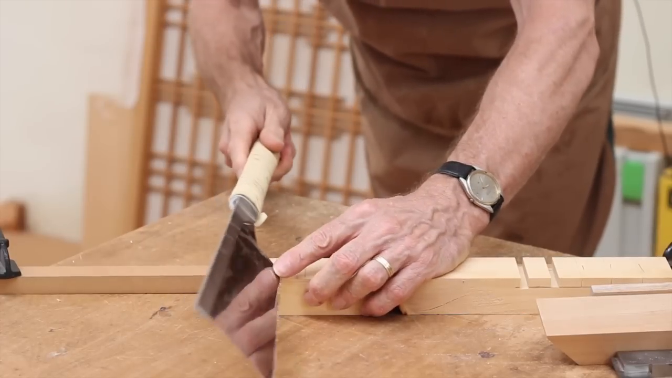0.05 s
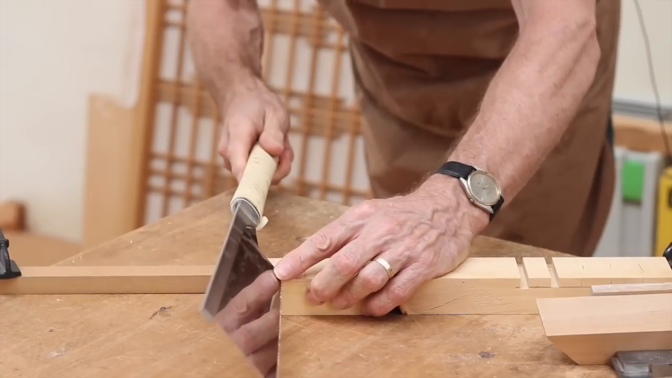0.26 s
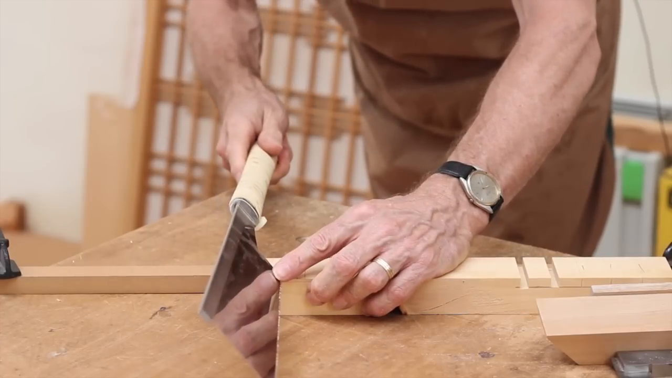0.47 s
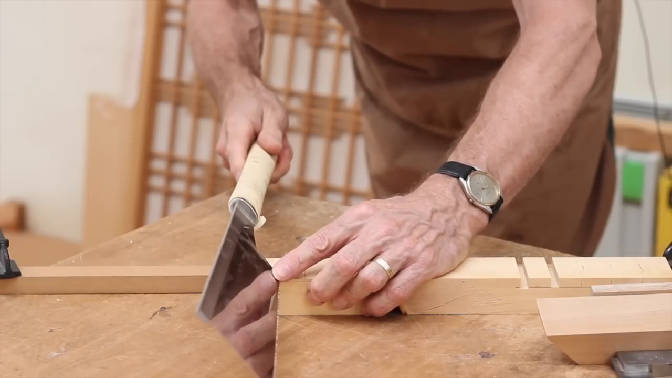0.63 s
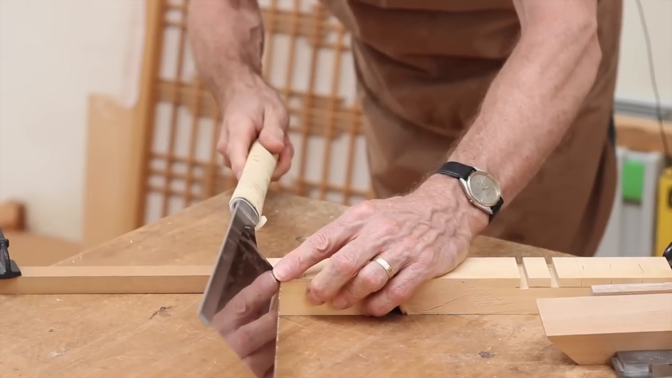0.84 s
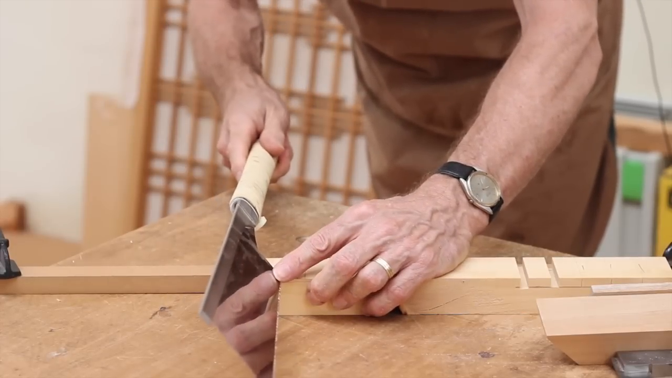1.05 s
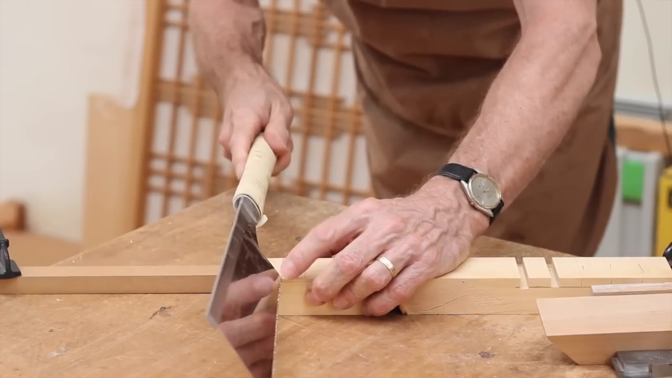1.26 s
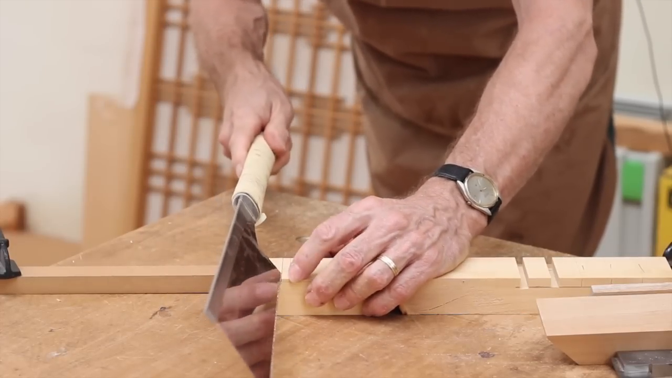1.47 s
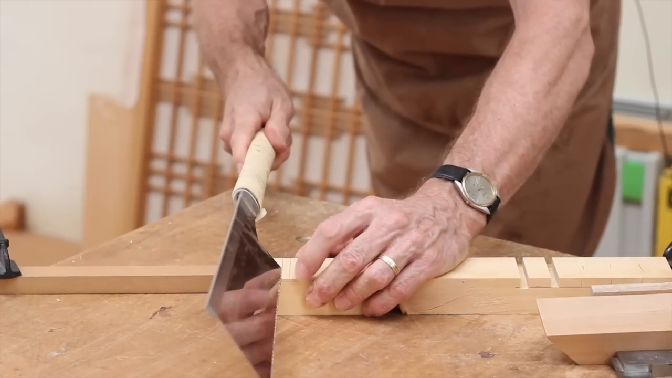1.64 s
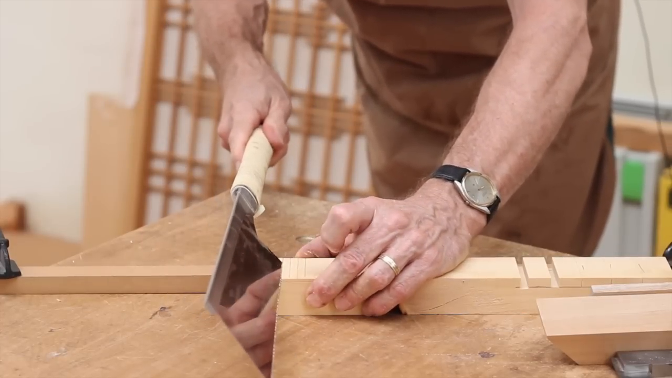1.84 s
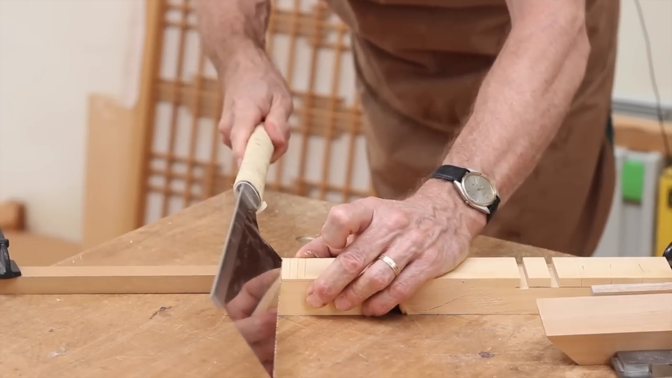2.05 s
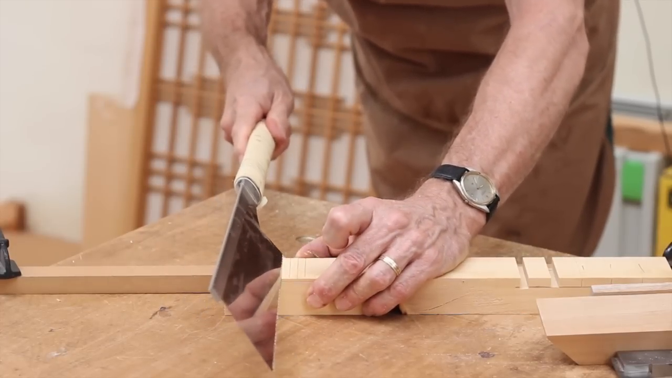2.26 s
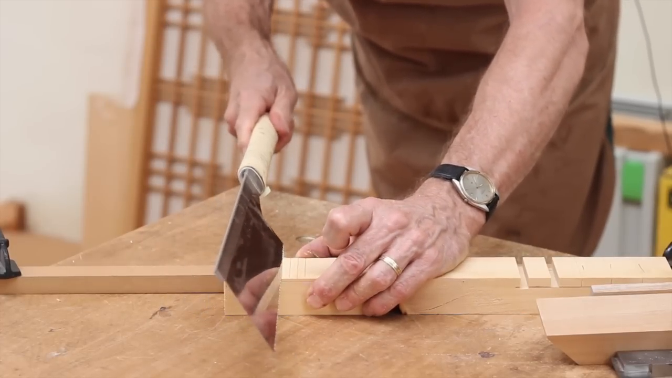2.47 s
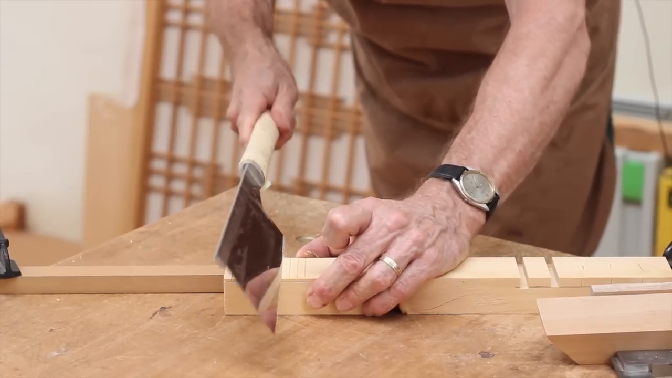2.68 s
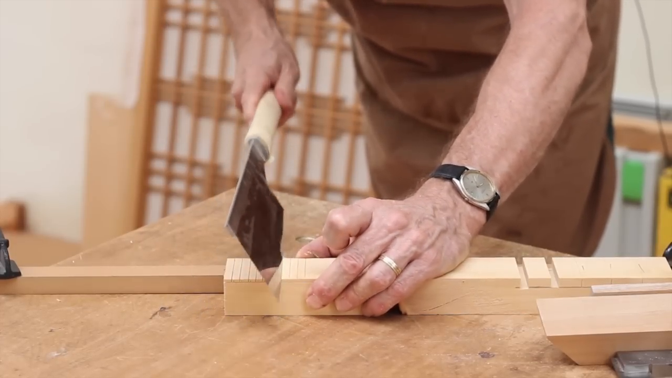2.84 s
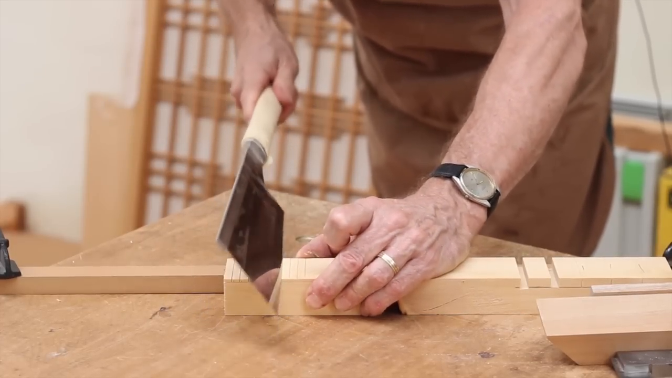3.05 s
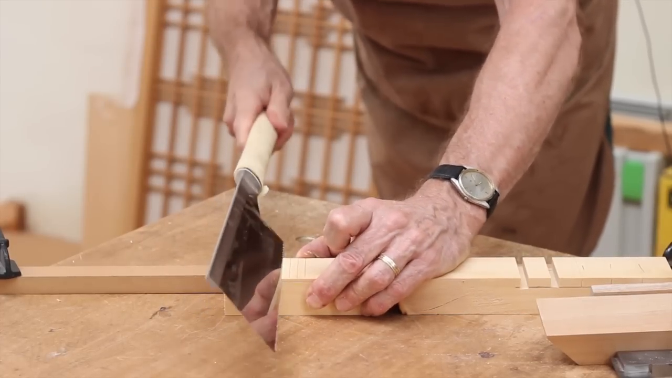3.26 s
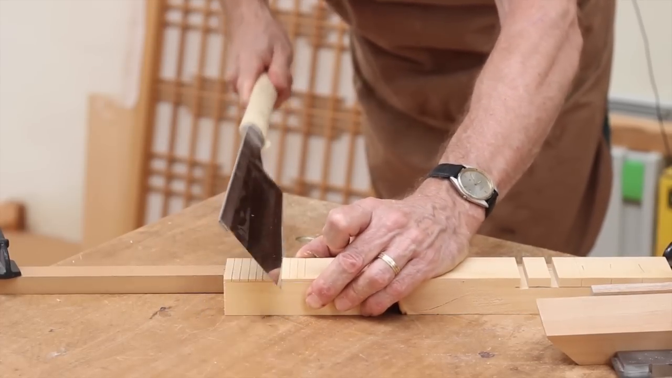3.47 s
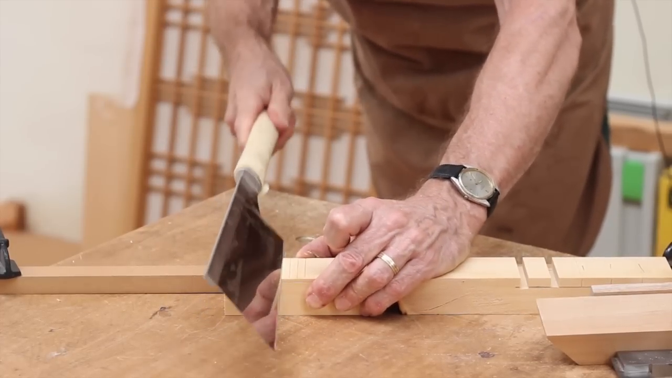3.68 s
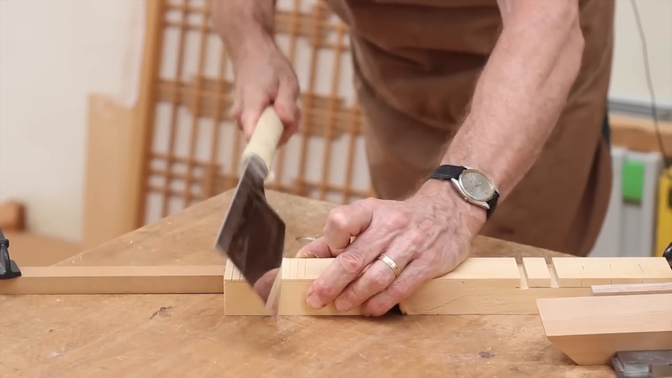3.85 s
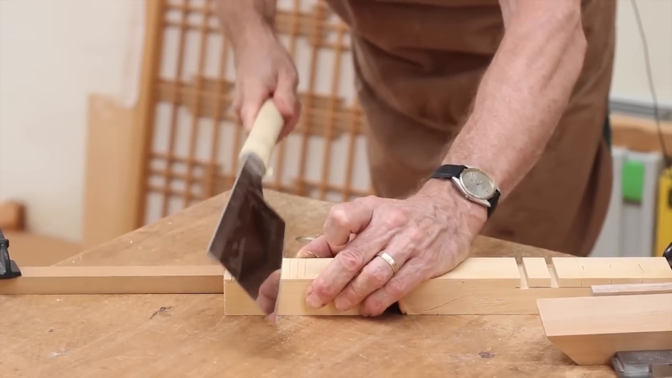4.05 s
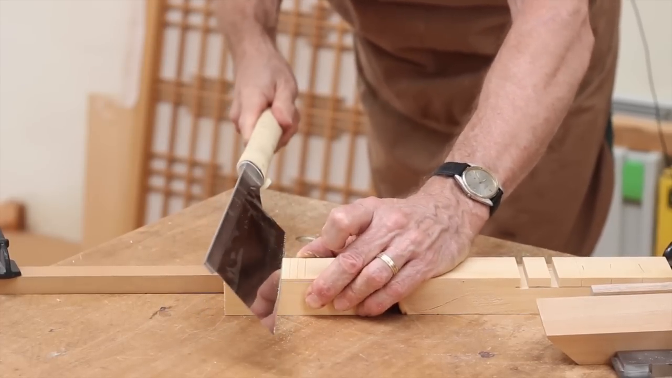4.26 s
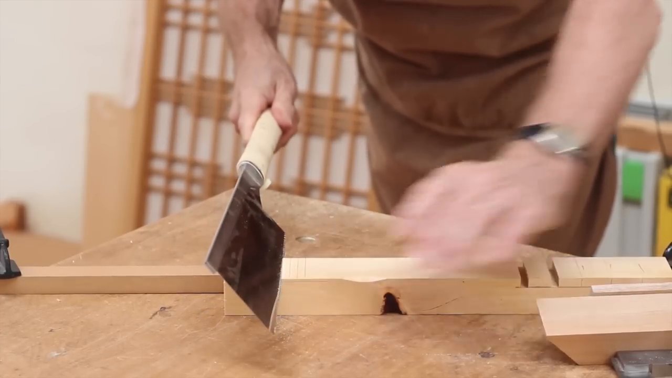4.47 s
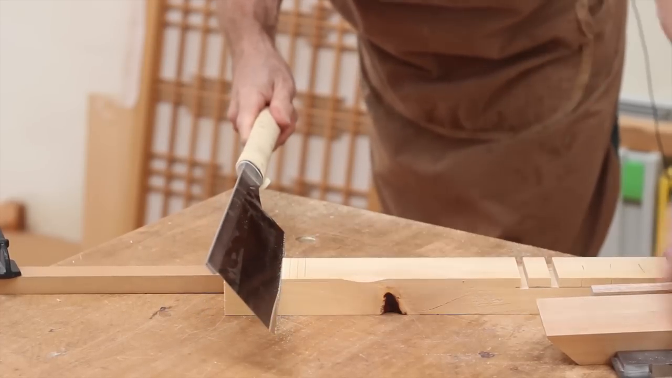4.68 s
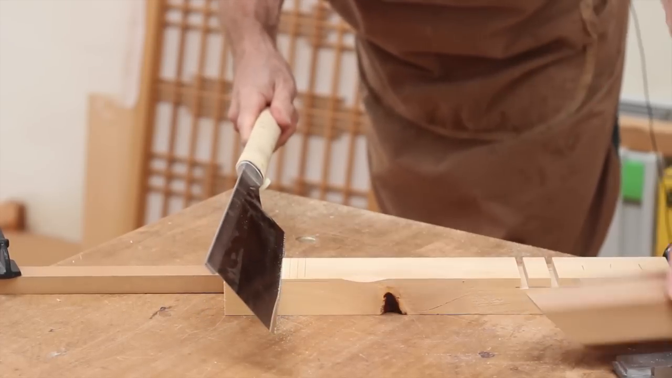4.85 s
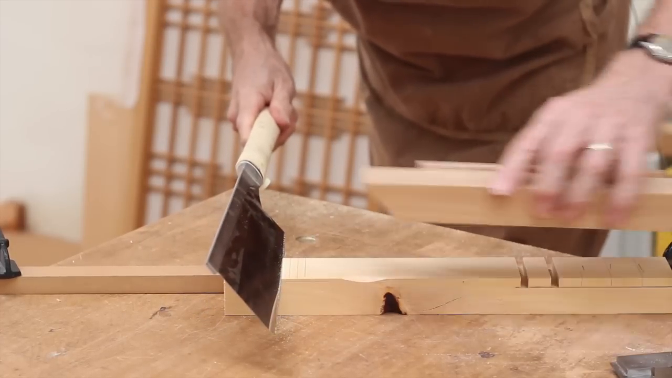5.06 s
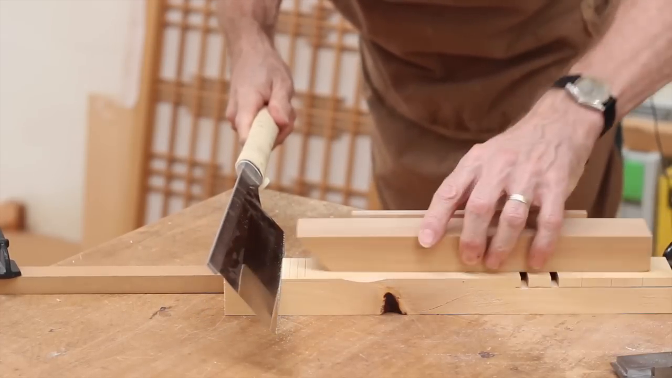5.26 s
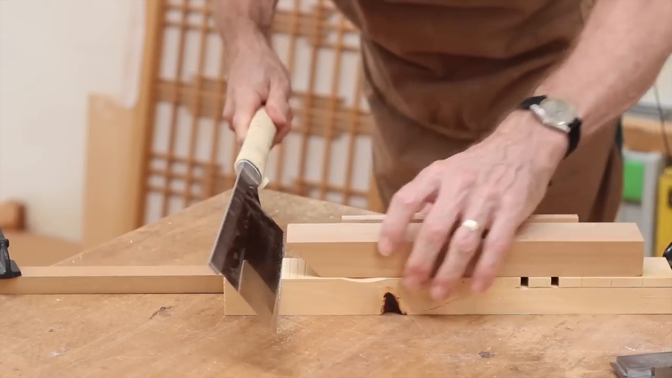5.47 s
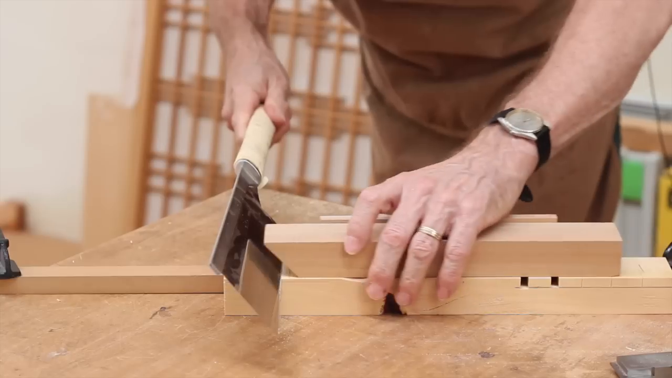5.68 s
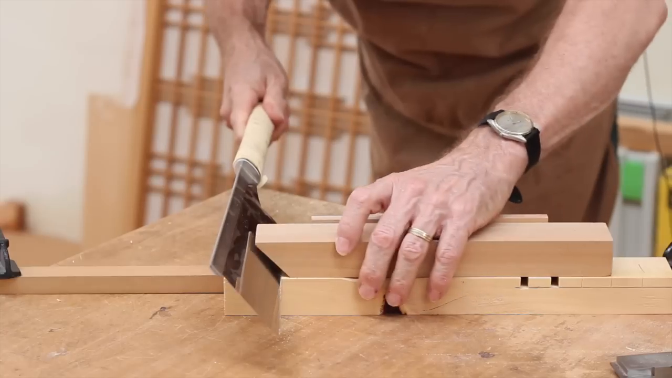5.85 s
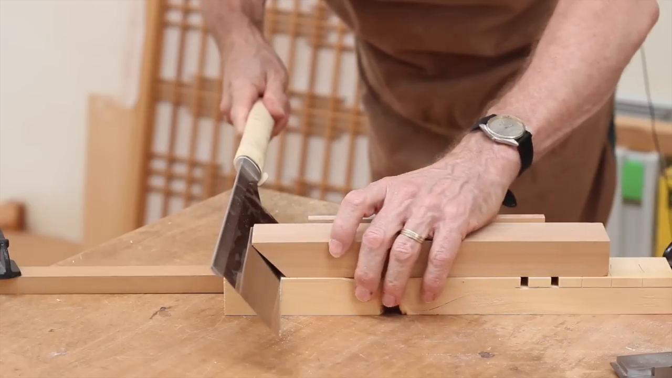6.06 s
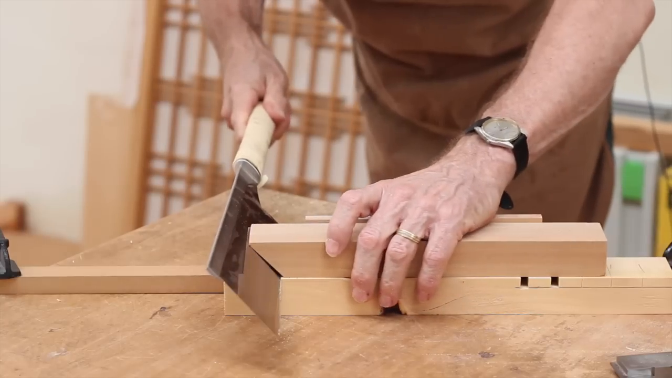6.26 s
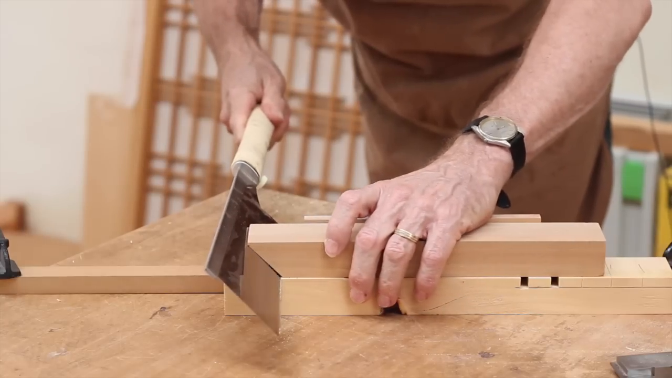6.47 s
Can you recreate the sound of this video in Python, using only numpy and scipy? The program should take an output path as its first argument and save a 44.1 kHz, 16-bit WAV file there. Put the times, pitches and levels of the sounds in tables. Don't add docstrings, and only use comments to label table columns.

```python
import sys
import numpy as np
from scipy import signal
from scipy.fft import rfft, irfft
from scipy.io import wavfile
from scipy.ndimage import uniform_filter1d

SR = 44100
rng = np.random.default_rng(int(sys.argv[2]) if len(sys.argv) > 2 else 0)


def natural_amplitude(level_db):
    exponent = np.asarray(level_db, float) / 20
    return 10 ** exponent


def generate_wav(sig):
    pcm = np.round(np.clip(np.atleast_2d(sig).T, -1, 1) * 32767).astype(np.int16)
    wavfile.write(sys.argv[1], SR, pcm)


N = 287532


def rms_one(x):
    return x / np.sqrt(np.mean(x ** 2) + 1e-20)


def in_time(rows):
    s, *columns = np.transpose(rows)
    return [np.interp(np.arange(N) / SR, s, c) for c in columns]


def band_pass(x, order, low_hz, high_hz):
    return signal.sosfilt(signal.butter(order, [low_hz, high_hz], "band", fs=SR, output="sos"), x)


def coloured(points):
    log_hz = np.log(np.arange(N // 2 + 1) * SR / N + 1)
    point_hz, point_db = np.transpose(points)
    shape = natural_amplitude(np.interp(log_hz, np.log(point_hz), point_db))
    return rms_one(irfft(rfft(rng.standard_normal(N)) * shape, N))


def resonate(x, peaks):
    out = 0
    for k, (hz, width, level_db) in enumerate(peaks):
        r = np.exp(-np.pi * width / SR)
        b = (1 - r * r) / 2 * np.array([1, 0, -1])
        a = [1, -2 * r * np.cos(2 * np.pi * hz / SR), r * r]
        out = out + (-1) ** k * natural_amplitude(level_db) * signal.lfilter(b, a, x)
    return out


def ring(clicks, hz, t60):
    r = natural_amplitude(-60 / (t60 * SR))
    w = 2 * np.pi * hz / SR
    return signal.lfilter([0, np.sin(w)], [1, -2 * r * np.cos(w), r * r], clicks + 1e-18)


def strike(times, sizes, modes, spread_db):
    at = np.round(np.array(times) * SR).astype(int)
    out = np.zeros(N)
    chance = rng.standard_normal((len(at), len(modes)))
    for k, (hz, level_db, t60) in enumerate(modes):
        clicks = np.zeros(N)
        clicks[at] = (-1) ** k * sizes * natural_amplitude(level_db + spread_db * chance[:, k])
        out += ring(clicks, hz, t60)
    return out


def grains(per_s, spread_db):
    sizes = natural_amplitude(spread_db * np.minimum(rng.exponential(1, N), 3)) * rng.choice([-1, 1], N)
    return rms_one(sizes * (rng.random(N) < per_s / SR))


def bursts(times, sizes, decay_s):
    hits = np.zeros(N)
    hits[np.round(np.array(times) * SR).astype(int)] = sizes
    return signal.lfilter([1], [1, -np.exp(-1 / (decay_s * SR))], hits) * rng.standard_normal(N)


def swells(start, top, end, level_db, fall_db, curve):
    t = np.arange(0, N + 32, 32) / SR
    power = 1e-14
    for a, b, c, db in zip(start, top, end, level_db):
        before, after = (b - t) / max(b - a, .005), (t - b) / max(c - b, .005)
        away = np.where(t < b, before, after)
        power = power + natural_amplitude(2 * np.maximum(db - fall_db * away ** curve, -200))
    return np.interp(np.arange(N) / SR, t, 10 * np.log10(power))


# (frequency [Hz], level per Hz [dB])
HISS = [(25, 5), (150, 1), (600, -1), (2000, 0.5), (8000, 1), (15000, -0.5)]
HISS_DB = [
    [-52],
    [-53],
]


def preamp_hiss():
    return natural_amplitude(np.array(HISS_DB)) * np.array([coloured(HISS), coloured(HISS)])


# (frequency [Hz], level per Hz [dB])
AIR = [(25, -10.5), (72, 0), (200, -4), (430, -10), (600, -11), (870, -5.5), (1300, -10), (2200, -21.5),
       (4000, -32.5), (9000, -43)]


def room_air(duck_db):
    fade_db = 0.37 * np.arange(N) / SR
    return natural_amplitude(-40 - fade_db + .08 * duck_db) * coloured(AIR)


# (frequency [Hz], time to fall 60 dB [s], level [dB])
SHOP = [(169, 1, 2.5), (398, 0.9, -4), (920, 0.39, 10), (2060, 0.98, -5), (3730, 1, 8.5), (6900, 0.39, 20)]


def shop(x):
    t, tail = np.arange(SR) / SR, 0
    for hz, t60, level_db in SHOP:
        band = band_pass(rng.standard_normal(SR), 2, hz / 1.6, hz * 1.6)
        tail = tail + band / np.sqrt(hz) * natural_amplitude(level_db - 60 * t / t60)
    tail = tail * np.clip((t - .004) / 0.016, 0, 1)
    return signal.fftconvolve(x, tail / np.sqrt(SR / 1000))[:N]


# (time of deepest dip [s], depth [dB])
BITES = [
    (2.48, 19),
    (2.58, 14),
    (2.92, 18),
    (3.575, 13.5),
    (5.4, 10.5),
]


def limiter_db():
    t = np.arange(N) / SR
    attack_db_per_s, hold_s, release_db_per_s = 145, 0.052, 40
    dips = []
    for s, depth_db in BITES:
        attack = attack_db_per_s * np.maximum(s - t, 0)
        release = release_db_per_s * np.maximum(t - s - hold_s, 0)
        dips.append(depth_db - attack - release)
    return -np.maximum(np.max(dips, axis=0), 0)


# (start [s], peak [s], end [s], level [dB])
SLEEVE = [
    (4.27, 4.32, 4.45, -64),
    (4.555, 4.62, 4.786, -40.5),
]
# (frequency [Hz], width [Hz], level [dB])
CLOTH = [(3060, 670, 2.5), (4600, 2400, -3), (6760, 2400, -6.5), (11800, 220, -7)]


def sleeve():
    swish_db = swells(*np.transpose(SLEEVE), fall_db=17, curve=2.3)
    return natural_amplitude(swish_db) * rms_one(resonate(grains(8300, 2), CLOTH))


# (time [s], peak level [dB])
CREAKS_OUT = [(1.3688, -29), (1.382, -21.5), (1.399, -20.5), (1.4172, -21), (1.4646, -19), (1.476, -23),
              (1.4858, -20), (1.495, -20), (1.503, -23), (1.5205, -18.5), (1.5445, -18.5), (1.577, -19.5),
              (1.5968, -18.5), (1.6144, -17), (1.6346, -20.5), (1.6687, -19.5), (1.695, -21), (1.755, -21.5),
              (1.774, -20.5), (1.7876, -21), (1.943, -19.5), (2.053, -16.5), (2.0596, -22), (2.0773, -19.5),
              (2.0954, -18), (2.139, -15), (2.1973, -15), (5.2604, -29.5), (5.279, -29), (5.31, -28.5)]
# (time [s], peak level [dB])
CREAKS_BACK = [(0.014, -24.5), (0.0221, -29), (0.029, -28), (0.0374, -25.5), (0.0492, -22), (0.0784, -26.5),
               (0.6578, -28), (0.6847, -21), (3.059, -27), (3.091, -23.5), (3.6662, -17), (4.0669, -21.5),
               (4.0848, -23), (4.382, -31), (4.4105, -30), (4.5204, -26.5), (4.5384, -26), (4.562, -28),
               (4.5741, -25), (4.744, -28), (4.8915, -26.5), (4.9134, -22)]
# (frequency [Hz], level [dB], time to fall 60 dB [s])
CREAK_MODES = [(407, 4.5, 0.017), (1270, -9.5, 0.0093), (3820, -24, 0.0055)]


def creaks():
    s, peak_db = np.transpose(CREAKS_OUT + CREAKS_BACK)
    way = np.repeat([1, -1], [len(CREAKS_OUT), len(CREAKS_BACK)])
    hz, level_db, t60 = CREAK_MODES[0]
    swing_s = 1.5 / hz
    swing = strike(s, np.sign(way) * natural_amplitude(peak_db + 2.5), CREAK_MODES[:1], 0)
    stop = np.roll(swing, round(swing_s * SR)) * natural_amplitude(-60 * swing_s / t60) * .9
    snap_db = peak_db + 4.5 - 3.5 * (way < 0)
    snap = strike(s, np.sign(way) * natural_amplitude(snap_db), CREAK_MODES[1:], 4)
    return band_pass(swing + stop + snap, 1, 260, 6000)


# (time [s], peak level [dB], damping by the hand [times])
KNOCKS = [(5.3628, -34, 3), (5.3648, 1.5, 1.08), (5.3685, -2, 0.91), (5.4452, -8.5, 3.5), (5.466, -17, 5.6),
          (5.651, -29.5, 2.0), (5.31, -31, 4.9), (4.1, -36, 3.5), (5.775, -30.5, 2.9), (6.12, -28.5, 2),
          (4.8883, -31.5, 2.2), (4.905, -34, 1.5), (4.921, -35, 2.2), (4.934, -37, 2.2)]
# (frequency [Hz], level [dB], time to fall 60 dB [s])
BLOCK = [(185, -22, 0.28), (372, -12, 0.092), (472, -21, 0.16), (888, -3, 0.06), (1010, -6, 0.033),
         (1195, -0.5, 0.041), (1342, 5.5, 0.021), (1542, 6.5, 0.023), (1803, -2, 0.057), (2028, 0, 0.048),
         (2290, -5, 0.047), (2540, -1, 0.016), (3330, -13, 0.0045), (3670, -4, 0.0037)]
# (time [s], peak level [dB])
CLINKS = [
    (4.8885, -44),
    (4.904, -42),
    (4.9195, -34),
]
# (frequency [Hz], level [dB], time to fall 60 dB [s])
STEEL = [(4630, -10, .16), (4850, -4, .02), (5080, -1, .05), (6578, -11, .06), (8522, -7, .06),
         (10690, -8, .03)]


def block():
    mode_spread_db = 2
    knocks = 0
    for t, db, damping in KNOCKS:
        damped = [(hz, level_db, t60 / damping) for hz, level_db, t60 in BLOCK]
        knocks = knocks + strike([t], natural_amplitude(db - 6.0), damped, mode_spread_db)
    knocks = signal.sosfilt(signal.butter(2, 5000, fs=SR, output="sos"), knocks)
    s, peak_db, damping = np.transpose(KNOCKS)
    crack = signal.lfilter([.4], [1, -.6], bursts(s, natural_amplitude(peak_db - 16.0), decay_s=0.002))
    thud = bursts(s, natural_amplitude(peak_db - 2.5 - 1.0 * damping), decay_s=0.0087)
    thud = band_pass(thud, 4, 784, 2640)
    s, peak_db = np.transpose(CLINKS)
    return knocks + crack + thud + strike(s, natural_amplitude(peak_db), STEEL, mode_spread_db)


# (time [s], peak level [dB])
CATCHES = [(2.3756, -18), (2.3845, -15), (2.391, -17), (2.3983, -7), (2.4058, -8), (2.4205, -7),
           (2.435, -13), (2.4489, -5), (2.4591, -11), (2.4769, -19), (2.4981, -15), (2.511, -5.5),
           (2.525, -2), (2.5435, -11), (2.582, -15), (2.5971, -8), (2.6168, -6), (2.7283, -17),
           (2.741, -12), (2.7525, -13), (2.8027, -13), (2.8111, -12), (2.8295, -5.5), (2.856, -4),
           (2.8745, -5.5), (2.9, -9.5)]
# (frequency [Hz], level [dB], time to fall 60 dB [s])
SNAG = [(906, -0.5, 0.012), (1080, -20, 0.0099), (1900, -14.5, 0.015), (4340, -25, 0.019)]
# (time [s], peak level [dB], share in the blade [dB])
SPLINTERS = [(1.521, -35.5, -17), (1.618, -26, -23), (2.351, -34.5, -12), (2.3753, -29.5, -12),
             (2.5435, -36, -14), (2.581, -40, -12), (2.712, -40, -11), (2.4207, -34, -18),
             (2.4597, -27.5, -15), (2.5094, -28, -15), (2.5254, -31, -15), (2.5624, -38, -8),
             (2.597, -38.5, -11), (2.614, -42, -8), (2.7281, -18.5, -24), (2.741, -26.5, -10.5),
             (2.752, -28, -11), (2.835, -29, -14), (2.8399, -31, -13), (2.86, -16, -28), (2.87, -11.5, -39),
             (2.9003, -17, -39), (2.9152, -17.5, -42)]
# (frequency [Hz], width [Hz], level [dB])
FIBRE = [(1610, 270, 2.5), (2220, 570, 1.5), (2794, 450, -1.5), (3530, 300, -7), (4000, 880, -14.5)]
# (frequency [Hz], width [Hz], level [dB])
BLADE = [(4450, 2600, 1.5), (7000, 170, -8), (8080, 480, -10.5), (11000, 3600, 6.5), (11340, 510, 13),
         (13300, 950, 3)]


def catches():
    s, peak_db = np.transpose(CATCHES)
    plucked = band_pass(strike(s, -natural_amplitude(peak_db + 3), SNAG, 1.5), 2, 450, 3000)
    s, peak_db, blade_db = np.transpose(SPLINTERS)
    kerf = resonate(bursts(s, natural_amplitude(peak_db + 17.0), decay_s=0.0024), FIBRE)
    blade = resonate(bursts(s, natural_amplitude(peak_db + blade_db + 14.0), decay_s=0.002), BLADE)
    return plucked + kerf + blade


# (start [s], hardest pressure [s], end [s], wood level
# [dB], blade hiss level [dB])
STROKES = [(1.494, 1.62, 1.718, -35.5, -59), (1.729, 1.784, 2.01, -37, -60),
           (2.123, 2.206, 2.265, -31.5, -49), (2.347, 2.403, 2.483, -25.5, -43.5),
           (2.4, 2.501, 2.583, -28, -49.5), (2.556, 2.6, 2.69, -32.5, -71), (2.7, 2.746, 2.92, -30, -48),
           (2.748, 2.863, 3, -22.5, -47), (2.92, 2.987, 3.105, -37.5, -59),
           (3.093, 3.22, 3.373, -30.5, -41), (3.39, 3.457, 3.53, -26, -33.5),
           (3.424, 3.536, 3.622, -20.5, -38), (3.628, 3.678, 3.87, -31, -37.5),
           (3.853, 3.976, 4.08, -27, -34.5), (4.076, 4.155, 4.266, -31.5, -42),
           (4.516, 4.674, 4.75, -47, -61), (4.881, 4.91, 5.03, -38, -72)]
# (time [s], rate [teeth per s], evenness [0-1])
TEETH = [(2.3, 200, .12), (2.4, 140, .5), (2.66, 75, .5), (2.87, 170, .4), (3.05, 200, .2), (3.2, 325, .75),
         (3.32, 326, .65), (3.42, 179, .6), (3.51, 304, .9), (3.555, 281, .92), (3.62, 286, .88),
         (3.73, 285, .65), (3.82, 260, .2), (3.88, 410, .4), (3.98, 474, .75), (4.09, 320, .3),
         (4.165, 356, .75), (4.26, 305, .3)]
# (frequency [Hz], width [Hz], level [dB])
BENCH = [(82.6, 53, -6), (142.3, 50, 0), (184.7, 62, 1.5), (259, 136, -0.5), (420, 156, -1)]
# (frequency [Hz], width [Hz], level [dB])
WOOD = [(565, 142, 4), (858, 226, 4), (1170, 213, 4), (1457, 107, 0.5), (1570, 150, -13.5)]
# (frequency [Hz], width [Hz], level [dB])
SCORE = [(1760, 620, 0.5), (2350, 370, 7), (3000, 850, -4.5), (3600, 370, -2), (4370, 960, -16)]


def saw():
    start, top, end, press_db, speed_db = np.transpose(STROKES)
    wood_db = swells(start, top, end, press_db, fall_db=17, curve=1.88)
    blade_db = swells(start, (start + end) / 2, end, speed_db, fall_db=27.5, curve=2.2)
    bench_db = -37.5 + 0.58 * (wood_db + 30.5)
    hum_db = -26.5 + 1.78 * (wood_db + 19.5)

    deepening_db = 6.5 * np.maximum(top - 3.52, 0) * (top < 4.4)
    press_share = 0.65
    tear_db = -1.5 + deepening_db + press_share * press_db + (1 - press_share) * speed_db
    fibre_db = swells(start, (start + 2 * top + end) / 4, end, tear_db, fall_db=24, curve=2.76)

    per_s, even = in_time(TEETH)
    even = np.clip(even, 0, 1)
    waver = rms_one(uniform_filter1d(rng.standard_normal(N), size=150))
    passed = np.cumsum(per_s / SR * (1 + .03 * waver)) + .022 * waver
    passed = np.maximum.accumulate(passed)
    bite = np.diff(np.floor(passed), prepend=0)
    bite = bite * natural_amplitude(2.5 * rng.standard_normal(N)) * np.sqrt(SR / per_s)
    cutting = np.exp(-2.0 * even * (passed % 1))
    scrub = grains(1200, 3.5)
    force = .9 * np.sqrt(even) * bite + np.sqrt(1 - even) * scrub
    shake = 0.47 * force + 0.59 * scrub
    tearing = cutting * grains(5000, 3)

    strip = natural_amplitude(wood_db) * rms_one(resonate(force, WOOD))
    bench = natural_amplitude(bench_db) * rms_one(resonate(resonate(shake, BENCH), BENCH))
    hum_peak = [(287, 87, 0)]      # (frequency [Hz], width [Hz], level [dB])
    hum = natural_amplitude(hum_db) * rms_one(resonate(resonate(force, hum_peak), hum_peak))
    kerf_opens_s = 2.32
    deep = np.interp(np.arange(N) / SR, [kerf_opens_s - .04, kerf_opens_s + .04], [0, 1])
    rip = 1.2 * tearing + force
    groove = natural_amplitude(1.5) * rms_one(resonate(rip, SCORE))
    kerf = rms_one(resonate(rip, FIBRE))
    fibres = natural_amplitude(fibre_db) * ((1 - deep) * groove + deep * kerf)
    blade = natural_amplitude(blade_db) * rms_one(resonate(tearing + 0.046 * force, BLADE))
    return natural_amplitude(6.0) * (strip + bench + hum + fibres + blade)


def scene():
    bench = saw() + catches() + block()
    duck_db = limiter_db()
    left_only = np.array([[1], [0]])
    echo = natural_amplitude(-1.5) * shop(bench) * left_only
    background = natural_amplitude(duck_db) * (preamp_hiss() + echo)
    return background + (room_air(duck_db) + bench + creaks() + sleeve()) * left_only


def top_cut(x):
    return signal.sosfilt(signal.butter(12, 16380, fs=SR, output="sos"), x)


def record(dry):
    return top_cut(np.clip(dry, -1, 1))


dry = scene()
out = record(dry)
generate_wav(out)
```